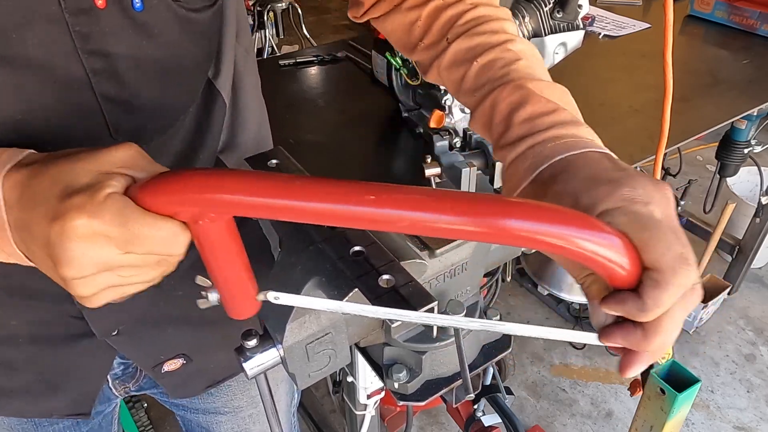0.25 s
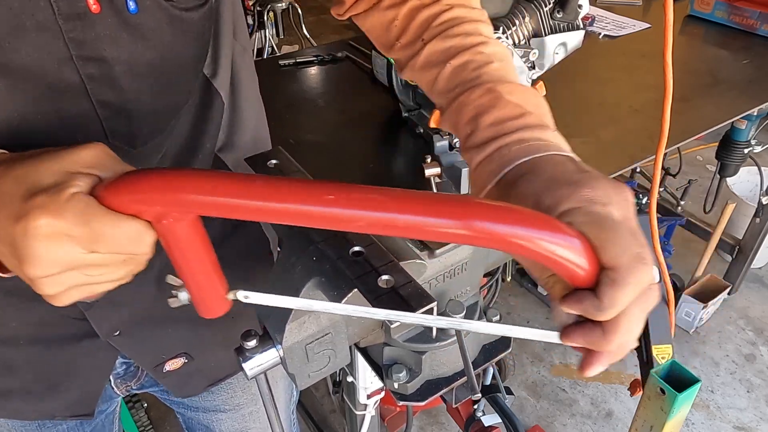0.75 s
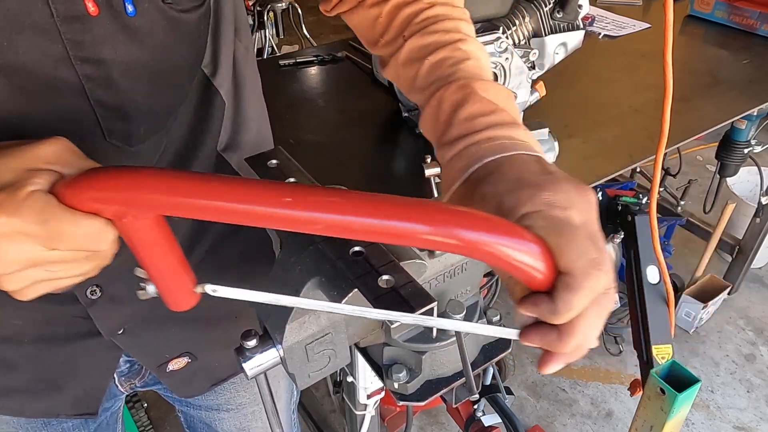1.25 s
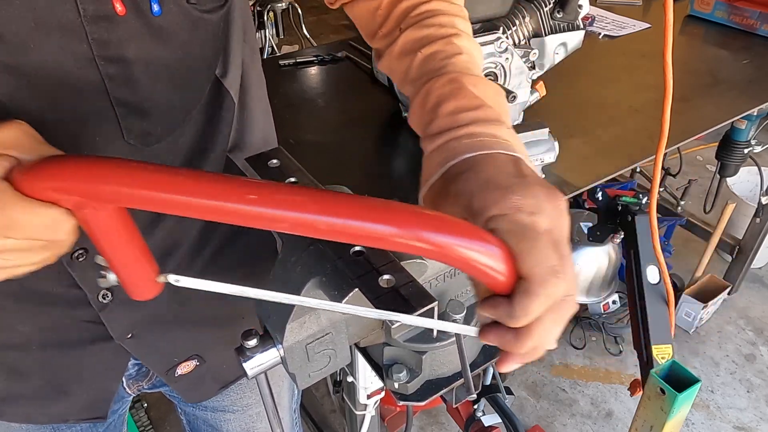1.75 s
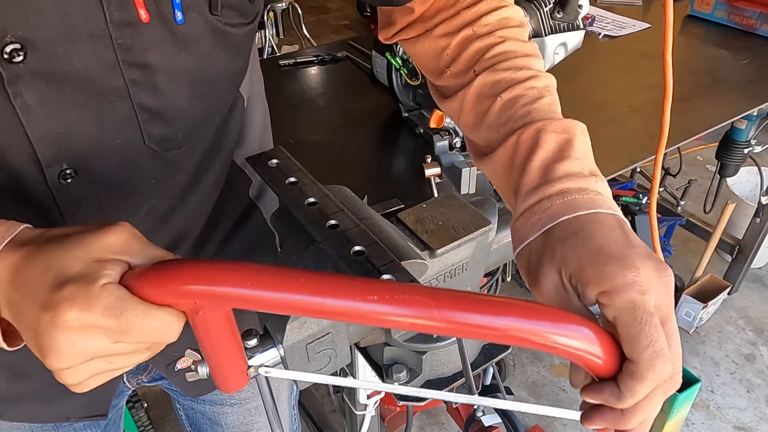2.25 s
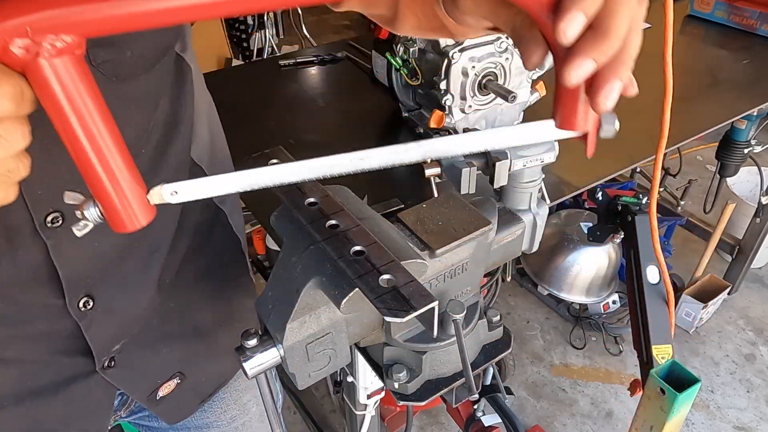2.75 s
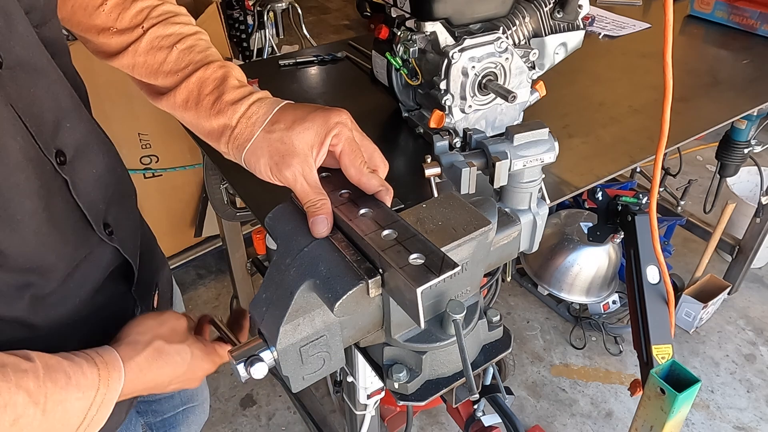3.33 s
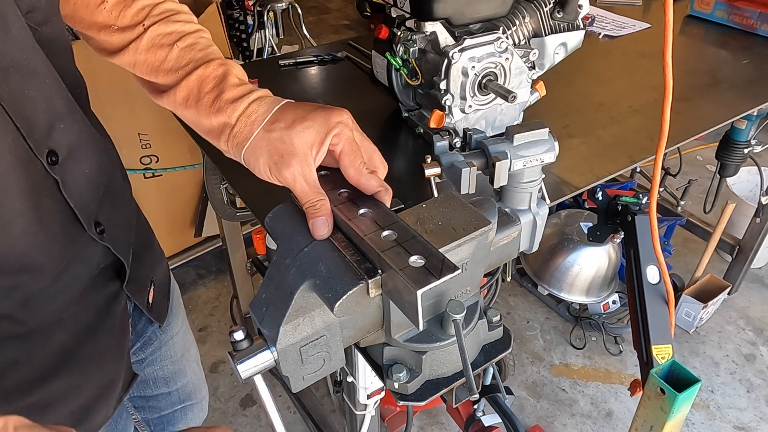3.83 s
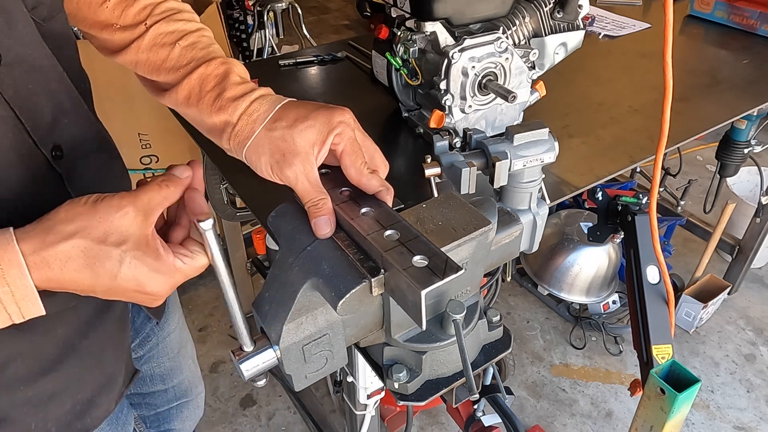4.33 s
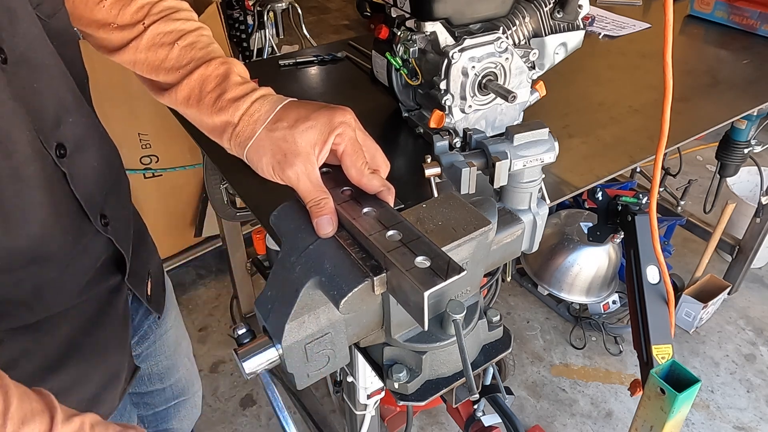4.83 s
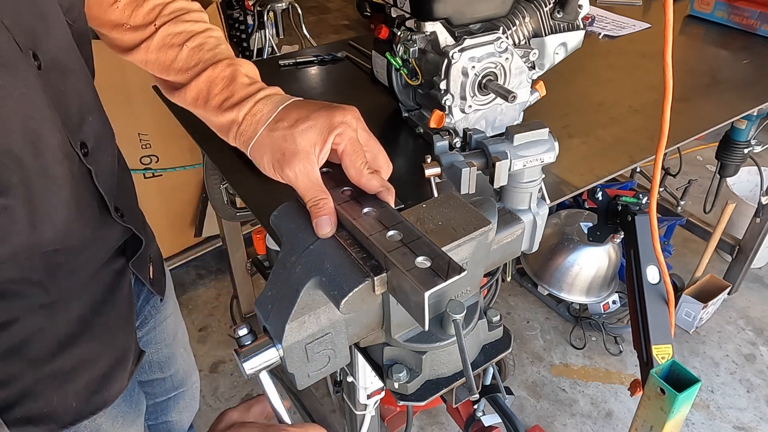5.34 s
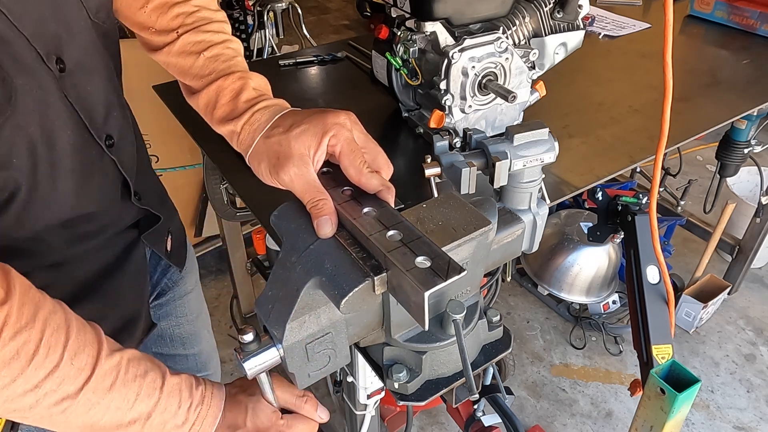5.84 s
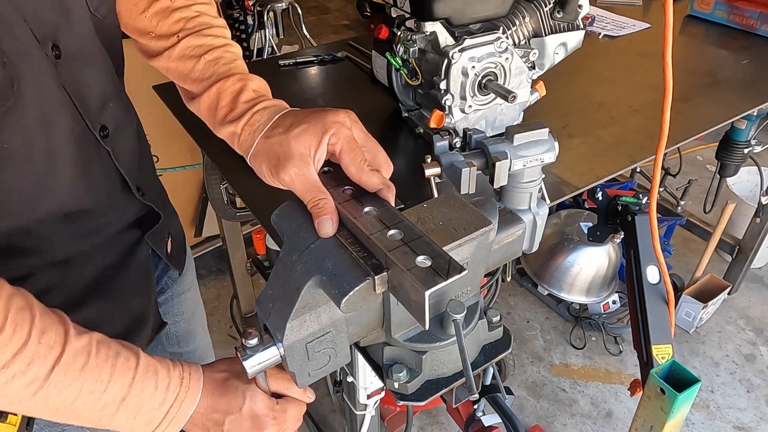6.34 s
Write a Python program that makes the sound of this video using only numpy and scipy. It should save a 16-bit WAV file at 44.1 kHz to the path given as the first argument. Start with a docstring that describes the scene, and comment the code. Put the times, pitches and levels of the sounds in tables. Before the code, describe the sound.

A hacksaw rasps fast through ringing steel, the offcut drops and bounces, then the saw is set down and a vise handle ticks and knocks.

```python
"""A garage, with two close microphone capsules at a workbench: low rumble, faint far traffic and rustling sleeves.
A hacksaw rasps through a steel bar in a bench vise: dense clicks ring bar, frame and bench in push and pull strokes.
The offcut drops and bounces as decaying modes and cracks of noise; the saw knocks and rattles when put down.
Then a hand works the vise: the handle ticks and jingles, the jaws knock, the bench thumps and a part clatters.
A short room of feedback delays follows the bench sounds."""
import sys
import numpy as np
from scipy import signal
from scipy.fft import rfft, irfft, next_fast_len
from scipy.io import wavfile

SR = 44100
rng = np.random.default_rng(int(sys.argv[2]) if len(sys.argv) > 2 else 0)


def wav_out(sig):
    """Save sig, one row per channel (or a flat mono array), as 16-bit PCM at SR to the path in sys.argv[1]."""
    wavfile.write(sys.argv[1], SR, np.round(np.clip(np.atleast_2d(sig).T, -1, 1) * 32767).astype(np.int16))


N = 290178


def from_db(db):
    """Gain of a level in dB."""
    return 10 ** (np.asarray(db) / 20)


def rms_one(x):
    """Scaled to rms 1."""
    return x / np.sqrt(np.mean(x ** 2) + 1e-20)


def in_time(rows):
    """Columns joined by lines; the first, a level in dB, falls silent outside the rows."""
    s, *columns = np.transpose(rows)
    t = np.arange(N) / SR
    out = [np.interp(t, s, column) for column in columns]
    out[0][(t < s[0]) | (t > s[-1])] = -200
    return out


def at_hz(points, hz):
    """Table value on a log-frequency axis."""
    points = np.array(points)
    return np.interp(np.log(hz + 1), np.log(points[:, 0]), points[:, 1])


def filtered(x, gain_at):
    """Applies a gain per frequency, with silence padded behind."""
    size = next_fast_len(N + SR // 4)
    hz = np.fft.rfftfreq(size, 1 / SR)
    return irfft(rfft(x, size) * gain_at(hz), size)[:N]


def colour(x, spectrum):
    """Shapes a dense sound by a spectrum."""
    return filtered(x, lambda hz: from_db(at_hz(spectrum, hz)))


def drift(per_s):
    """Slow chance of spread 1: low-passed noise drawn at every 40th sample and joined by lines."""
    r = np.exp(-80 * np.pi * per_s / SR)
    noise = rng.standard_normal(N // 40 + 1002)
    slow = rms_one(signal.lfilter([1], [1, -2 * r, r * r], noise)[1000:])
    return np.interp(np.arange(N) / 40, np.arange(len(slow)), slow)


def swells(rows):
    """Level in dB that rises and falls in a straight line around each movement."""
    t = np.arange(N) / SR
    return np.max([rise_db * np.clip(1 - np.abs(t - s) / half, 0, 1) for s, half, rise_db in rows], axis=0)


def grains(per_s, spread_db):
    """Random clicks of uneven size and sign."""
    signs = rng.choice([-1, 1], N)
    sizes = from_db(spread_db * np.minimum(rng.exponential(1, N), 4))
    return sizes * signs * (rng.random(N) < per_s / SR)


def resonate(x, peaks, wander_db, per_s):
    """Parallel resonances, signs alternating; each one's drive wanders as the contact point moves."""
    out = 0
    for k, (hz, width_hz, level_db) in enumerate(peaks):
        r = np.exp(-np.pi * max(width_hz, 2) / SR)
        poles = [1, -2 * r * np.cos(2 * np.pi * hz / SR), r * r]
        zeros = [(1 - r * r) / 2, 0, (r * r - 1) / 2]
        drive = x * from_db(level_db + wander_db * np.clip(drift(per_s), -3, 1.3))
        out = out + (-1) ** k * signal.lfilter(zeros, poles, drive)
    return out


def strike(times, blow_db, modes, spread_db, rise_s):
    """Each blow rings every mode with a strength of its own; one row per blow, blow_db per blow and mode."""
    t = np.arange(SR // 2) / SR
    out = np.zeros((len(times), len(t)))
    chance = rng.standard_normal((len(times), len(modes)))
    blow_db = np.broadcast_to(blow_db, chance.shape)
    for k, (hz, level_db, t60) in enumerate(modes):
        height = from_db(blow_db[:, k] + level_db + spread_db * chance[:, k])
        out += np.outer(height, np.sin(2 * np.pi * hz * t) * from_db(-60 * t / t60))
    return out * (1 - np.exp(-t / rise_s))


def contact(t60, low_hz, high_hz, rise_s):
    """Dying noise in a band, scaled to peak 1; one row per contact."""
    t = np.arange(SR // 2) / SR
    shape = (1 - np.exp(-t / rise_s)) * from_db(-60 * t / np.maximum(t60, .002)[:, None])
    burst = rng.standard_normal(shape.shape) * shape
    burst = signal.sosfilt(signal.butter(2, [low_hz, high_hz], "band", fs=SR, output="sos"), burst)
    return burst / np.abs(burst).max(axis=1, keepdims=True)


def place(times, rows, pan_db):
    """Rows laid out at their times in stereo; positive pan leans left."""
    out = np.zeros((2, N + SR))
    for s, row, pan in zip(times, rows, pan_db):
        at = round(s * SR)
        out[:, at:at + len(row)] += row * from_db([[pan / 2], [-pan / 2]])
    return out[:, :N]


# where the bench sits in the stereo field: pitch_hz, left_over_right_db
BENCH_BALANCE = [(60, -9), (150, 0), (370, -0.5), (930, -3.5), (2310, -1), (5740, -3), (14300, 3)]


def sided(mono):
    """The bench leans a little to the right over most of its pitches; the highest lean left."""
    half = np.array(BENCH_BALANCE) * [1, .5]
    return np.array([colour(mono, half), colour(mono, half * [1, -1])])


# how alike left and right are in the surrounding air: pitch_hz, likeness (1 = the same)
LIKENESS = [(25, .93), (120, 1), (500, 0.81), (2000, 0.25), (6000, 0.27), (14000, .5)]


def wide_noise(spectrum):
    """Stereo noise whose channels are most alike in the bass."""
    hz = np.fft.rfftfreq(N, 1 / SR)
    alike = np.clip(at_hz(LIKENESS, hz), 0, 1)
    mid, side = rfft(rng.standard_normal((2, N)))
    both = np.sqrt(1 + alike) * mid + np.sqrt(1 - alike) * side * [[1], [-1]]
    return rms_one(irfft(both * from_db(at_hz(spectrum, hz)), N))


# spectra of the garage floor and of the traffic far off: pitch_hz, relative level_db per Hz
RUMBLE_SPECTRUM = [(12, -51), (20, 1.5), (65, 4), (186, -3.5), (353, -18), (631, -38), (700, -29),
                   (910, -60), (1540, -120)]
TRAFFIC_SPECTRUM = [(290, -25), (500, -7.5), (711, -7), (1290, 2.5), (3450, -19.5), (5480, -20.5),
                    (8980, -24), (11900, -18.5), (14500, -32.5)]
RUMBLE_DB, SAWING_RUMBLE_DB = -47.5, 3.5   # at rest, and the rise while sawing
TRAFFIC_DB, TRAFFIC_SWAY_DB = -68, 2.4


def garage():
    """Low rumble, stronger while the saw shakes the bench, and faint far traffic."""
    last_release_s = STROKES[-1][1]
    sawing = np.clip((last_release_s + THRUM_FADE_S - np.arange(N) / SR) / THRUM_FADE_S, 0, 1)
    rumble_db = RUMBLE_DB + SAWING_RUMBLE_DB * sawing + 1.3 * drift(0.6)
    traffic_db = TRAFFIC_DB + TRAFFIC_SWAY_DB * drift(.4)
    return wide_noise(RUMBLE_SPECTRUM) * from_db(rumble_db) + wide_noise(TRAFFIC_SPECTRUM) * from_db(traffic_db)


# spectra of hissing cloth and of rubbing hands: pitch_hz, relative level_db per Hz
CLOTH_SPECTRUM = [(880, -17.5), (1500, 13.5), (3030, 9.5), (3950, 3), (4470, 10), (6790, 8), (12100, -19.5),
                  (14500, -27)]
RUBBING_SPECTRUM = [(120, -27), (200, 0), (305, -9.5), (437, -6), (696, -15.5), (1330, -17), (1460, -22.5),
                    (2500, -36), (3250, -63), (5500, -120)]
# arms move and cloth hisses: middle_s, half_length_s, rise_db above rest
REACHES = [(2.3, 0.63, 6), (3.19, .5, 3), (4.9, 0.25, 8.5), (5.75, 0.67, 2), (6.5, 0.55, 8.5)]
# hands rub on bar and screw: middle_s, half_length_s, rise_db above rest
GRIPS = [(2.3, 0.068, 14.5), (3.85, 0.72, 17.5), (5.5, 0.35, 11.5), (6.3, 0.32, 12.5)]
CLOTH_DB, RUBBING_DB = -72, -68.5   # between movements


def rustle():
    """Cloth and skin rub in soft, flickering hiss."""
    cloth_db = CLOTH_DB + swells(REACHES) + 1.46 * drift(26)
    rubbing_db = RUBBING_DB + swells(GRIPS) + 2.9 * drift(10.0)
    return wide_noise(CLOTH_SPECTRUM) * from_db(cloth_db) + wide_noise(RUBBING_SPECTRUM) * from_db(rubbing_db)


# short brushes of sleeve or palm: start_s, rise_s, fall_s, level_db, low_hz, high_hz
SWISHES = [(2.593, 0.078, .04, -56, 3000, 7750), (2.89, .006, .16, -56.5, 1530, 7900),
           (3.062, 0.057, 0.022, -66.5, 8500, 13400), (4.293, 0.036, 0.057, -61, 3550, 7800),
           (4.437, .03, .07, -70, 2960, 6960), (5.597, 0.033, 0.097, -62, 3000, 8540),
           (6.466, 0.022, .05, -65, 3000, 8900)]


def brushes():
    """Grainy fibre clicks in a band swell and fade with each brush, alike in both channels."""
    out = np.zeros((2, N))
    fibres = grains(5000, 2.1) * from_db(2.3 * drift(60))
    for s, rise, fall, level_db, low_hz, high_hz in SWISHES:
        at = round(s * SR)
        t = np.arange(min(SR // 4, N - at)) / SR
        band = signal.butter(2, [low_hz, high_hz], "band", fs=SR, output="sos")
        brush = rms_one(signal.sosfilt(band, fibres[at:at + len(t)]))
        shape = np.clip(np.minimum(t / rise, 1 - (t - rise) / fall), 0, 1) ** 0.97
        out[:, at:at + len(t)] += from_db(level_db) * shape * brush
    return out


ROOM_T60_S, WALL_CUT_HZ, ROOM_DB = 0.39, 5100, -22.5   # t60 in the bass; walls take more treble


def room(x):
    """Eight feedback delays a side, duller on every round."""
    size = next_fast_len(N + SR)
    hz = np.fft.rfftfreq(size, 1 / SR)
    wall = 1 / (1 + 1j * hz / WALL_CUT_HZ)
    out = np.zeros((2, len(hz)), complex)
    for k, lag_s in enumerate(rng.uniform(0.0074, 0.032, 16)):
        loop = from_db(-60 * lag_s / ROOM_T60_S) * wall * np.exp(-2j * np.pi * hz * lag_s)
        out[k % 2] += loop / (1 - loop) * (-1) ** (k // 2)
    return irfft(out * rfft(x, size), size)[:, :N]


# sliding handle modes: pitch_hz, level_db, t60_s
HANDLE_MODES = [(2860, -4, .06), (3300, -2, .07), (3660, 0, .05), (4420, 0, .055), (5480, -1, .08),
                (6750, -3, .06), (8250, -9, .035), (10100, -13, .04), (11900, -17, .03)]
# the loose handle jingles in its bore while it is turned: middle_s, half_length_s, rise_db above rest
JINGLES = [(4.08, 0.18, 23), (4.4, 0.27, 17), (4.79, 0.095, 32), (4.96, 0.17, 27)]
JINGLE_REST_DB = -88.5


def jingle():
    """Small random contacts ring the handle modes."""
    # a mode's t60 sets the width of its resonance
    peaks = [(hz, np.log(1000) / np.pi / t60, level_db) for hz, level_db, t60 in HANDLE_MODES]
    ring = rms_one(resonate(grains(180, 3.0), peaks, wander_db=4.0, per_s=13.5))
    return sided(ring * from_db(JINGLE_REST_DB + swells(JINGLES)))


TICK_T60_S, KNOCK_T60_S = 0.021, 0.13


def taps(tick_db, knock_db):
    """A bright tick and a dull knock; one row per tap."""
    tick = contact(np.full(len(tick_db), TICK_T60_S), 3500, 7360, rise_s=0.00089)
    knock = contact(np.full(len(tick_db), KNOCK_T60_S), 940, 3130, rise_s=0.00025)
    knock = signal.sosfilt(signal.butter(2, 3500, fs=SR, output="sos"), knock)
    return from_db(tick_db)[:, None] * tick + from_db(knock_db)[:, None] * knock


# the loose handle taps its stop and rings: start_s, tick_db, ring_db
HANDLE_HITS = [(3.533, -67, -65), (3.7506, -58, -58.5), (3.923, -68, -66), (3.954, -67, -72),
               (4.001, -62, -62), (4.1595, -51, -64), (4.1974, -59, -62.5), (4.3993, -62, -70),
               (4.7113, -39.5, -46.5), (4.7675, -42, -53), (4.8723, -55, -63), (4.8843, -57, -56),
               (4.9124, -50, -60), (4.9465, -48.5, -70.5), (4.969, -54, -68), (4.997, -46.5, -63),
               (5.028, -51, -63), (5.0469, -51, -72)]
HANDLE_KNOCK_DB = -4   # dull knock relative to the tick
HANDS_PAN_DB, HANDS_CROSS_S = (4, -2.5), 3.1   # left over right, before and after this time


def handle():
    """Each tap of the handle ticks, knocks and rings its modes."""
    s, tick_db, ring_db = np.transpose(HANDLE_HITS)
    ring = strike(s, ring_db[:, None], HANDLE_MODES, spread_db=6.0, rise_s=0.0004)
    return place(s, taps(tick_db, tick_db + HANDLE_KNOCK_DB) + ring, 0 * s + HANDS_PAN_DB[1])


# touches on the vise, and at 3.253 s the knock of the saw put down:
# start_s, tick_db (bright), knock_db (dull), ring_db, pitch_hz (favoured among the modes)
KNOCKS = [(2.4269, -42, -59, -57, 1110), (2.4977, -46, -53.5, -70, 1750), (2.6197, -44, -62, -68, 1550),
          (2.6653, -40, -52, -47, 1550), (2.7372, -53, -76, -76, 1170), (2.8976, -43, -53, -56, 1500),
          (2.92, -37, -36, -59, 1520), (3.253, -19.5, -35.5, -34, 1630), (3.5339, -60, -42, -43.5, 1190),
          (3.8132, -67, -48, -38, 1230), (3.997, -56, -54, -40.5, 1310), (4.0208, -48, -35.5, -30.5, 1360),
          (4.34, -48, -67, -67, 1240), (4.4009, -51, -44, -30, 1363), (4.4513, -61, -50, -45, 1320),
          (5.2942, -49, -45, -37, 2100), (5.3254, -45.5, -30, -34, 1064), (5.4478, -56, -43.5, -51, 1050),
          (5.5977, -64, -49, -48, 1660), (6.5366, -47, -42.5, -61, 2090), (6.5432, -44, -28, -37.5, 2297)]
# jaw and screw modes: pitch_hz, level_db, t60_s
JAW_MODES = [(1064, -1, .13), (1180, -2, .07), (1315, 0, .1), (1620, -3, .06), (2070, -2, .05),
             (2330, -2, .07)]
JAW_DB_PER_OCTAVE = 45   # loss of a mode away from the favoured pitch


def knocks():
    """Touches on the vise, and the saw put down, each tap and ring the modes near a favoured pitch."""
    s, tick_db, knock_db, ring_db, favoured_hz = np.transpose(KNOCKS)
    octaves_off = np.abs(np.log2(np.array(JAW_MODES)[:, 0] / favoured_hz[:, None]))
    blow_db = ring_db[:, None] - JAW_DB_PER_OCTAVE * octaves_off
    rows = taps(tick_db, knock_db) + strike(s, blow_db, JAW_MODES, spread_db=0.5, rise_s=0.003)
    return place(s, rows, np.where(s < HANDS_CROSS_S, *HANDS_PAN_DB))


# the vise body thumps the bench: start_s, level_db
THUMPS = [(2.892, -48.5), (3.812, -59), (4.019, -38.5), (4.398, -56.5), (5.297, -32), (5.328, -39),
          (5.362, -31), (5.452, -36.5), (6.228, -38.5), (6.544, -32), (6.565, -48)]
# bench top modes: pitch_hz, level_db, t60_s
BENCH_TOP_MODES = [(190, -9, .12), (250, -9, .12), (283, 0, .2), (315, -6, .12), (380, -7, .1),
                   (470, -13, .08)]


def thumps():
    """Each thump rings the low modes of the bench top, in the middle of the stereo field."""
    s, level_db = np.transpose(THUMPS)
    return place(s, strike(s, level_db[:, None], BENCH_TOP_MODES, spread_db=1.2, rise_s=.006), 0 * s)


# spectrum of the part's contacts on the bench: pitch_hz, relative level_db per Hz
CLATTER_SPECTRUM = [(180, -46), (300, -29), (422, -6), (488, -35), (584, -7), (861, -20.5), (1270, -5),
                    (2430, -0.5), (3260, -10.5), (7100, -19), (14500, -42)]
# resonances of the part: pitch_hz, width_hz, level_db
CLATTER_PEAKS = [(1280, 120, -16), (1640, 80, -8.5), (2100, 90, -11), (2273, 91, 9), (2506, 90, 3.5),
                 (2655, 80, 8), (3560, 94, -5)]
CLATTER_S, CLATTER_DB = 6.2185, -24
CLATTER_RISE_S, CLATTER_HOLD_S, CLATTER_T60_S = 0.0053, 0.034, 0.26   # the hold counts from the start


def clatter():
    """A quick run of uneven contacts that rings the part and dies away."""
    since = np.maximum(np.arange(N) / SR - CLATTER_S, 0)
    fall_db = -60 * np.maximum(since - CLATTER_HOLD_S, 0) / CLATTER_T60_S
    level = np.minimum(since / CLATTER_RISE_S, 1) * from_db(CLATTER_DB + fall_db)
    hits = grains(3000, 1.5)
    ring = rms_one(resonate(hits, CLATTER_PEAKS, wander_db=-3.0, per_s=11.0))
    return sided((rms_one(colour(hits, CLATTER_SPECTRUM)) + from_db(-4) * ring) * level)


# saw frame resonances: pitch_hz, width_hz, level_db
FRAME_PEAKS = [(1050, 45, 4.5), (3320, 150, -9), (4700, 120, -3), (5380, 150, -2), (6600, 150, -9),
               (8600, 200, -4.5)]
SET_DOWN_S, SET_DOWN_DB, SET_DOWN_T60_S = 3.254, -44, 0.3


def set_down():
    """The saw frame is put down: a dying rattle through its resonances."""
    since = np.arange(N) / SR - SET_DOWN_S
    rattle = rms_one(resonate(grains(3000, 2.2), FRAME_PEAKS, wander_db=-0.5, per_s=20.0))
    level = from_db(SET_DOWN_DB - 60 * np.maximum(since, 0) / SET_DOWN_T60_S)
    return sided(rattle * (since > 0) * level)


# the offcut lands and bounces: start_s, level_db, crack_db (relative to level_db), crack_t60_s
BOUNCES = [(2.029, -9.5, -6.5, 0.2), (2.083, -9, -3.5, 0.21), (2.178, -17, 6, 0.13),
           (2.217, -14.5, -9.5, 0.063)]
# offcut modes: pitch_hz, level_db, t60_s
OFFCUT_MODES = [(963, -16, .2), (1064, -11, .32), (2243, -13, .3), (3784, -12, .26), (5172, -12, .18),
                (1329, -22, .26), (1690, -21, .2), (2650, -19, .28), (2909, -15, .2), (3270, -20, .12),
                (4794, -14, .12), (1768, -22, .2), (2051, -23, .2), (3038, -18, .13), (4511, -20, .12),
                (6264, -16, .13), (7580, -24, .15), (5000, -17, .06), (6730, -19, .05), (10070, -28, .12),
                (10530, -34, .12), (11640, -36, .1)]
AFTER_RATTLE_DB, AFTER_RATTLE_T60_S = -15, .32   # dense dull tail relative to each crack


def offcut():
    """Each bounce clacks, rattles and sets the free bar ringing."""
    s, level_db, crack_db, t60 = np.transpose(BOUNCES)
    crack = contact(t60, 1100, 5600, rise_s=0.00027)
    crack = crack + from_db(-25) * contact(0.73 * t60, 6400, 15000, rise_s=.001)
    tail = contact(0 * s + AFTER_RATTLE_T60_S, 900, 3400, rise_s=0.0093)
    crack = crack + from_db(AFTER_RATTLE_DB) * tail
    ring = strike(s, level_db[:, None], OFFCUT_MODES, spread_db=2.5, rise_s=.002)
    return sided(place(s, ring + from_db(level_db + crack_db)[:, None] * crack, 0 * s)[0])


# strokes, push and pull in turn:
# bite_s, release_s, early_db (rasp drive), late_db (rasp drive), thrum_db (relative drive of the bench)
STROKES = [(-.1, 0.031, -20.5, -27.5, -33), (0.108, 0.255, -23, -32, -32.5), (0.334, 0.49, -23, -28, -37),
           (0.57, 0.686, -20, -22.5, -29.5), (0.787, 0.958, -21.5, -28.5, -27.5),
           (1.031, 1.177, -22.5, -23.5, -29), (1.251, 1.433, -24.5, -26, -30),
           (1.505, 1.646, -23.5, -24, -31.5), (1.731, 1.881, -23.5, -24.5, -35.5),
           (1.951, 2.016, -26, -25, -33)]
CATCH_S, CATCH_DB = 0.021, -7.5   # the teeth catch quickly, this far under the early rasp, then dig in
BITE_S, EASE_S, EASE_DB = 0.049, 0.058, -19.5   # time to full rasp; easing off after release
TURN_DB = (-41, -52)   # rasp in the turn before (even, odd) strokes
# relative boost of the low ring: on (even, odd) strokes, and in the turn between two
EARLY_RING_DB, LATE_RING_DB, TURN_RING_DB = (-3.5, -5.5), (-3, 1), 5.5


def stroke_curve():
    """Each stroke catches, digs in, runs, and eases off into a quiet turn where the low modes stand out."""
    rows = []
    for k, (bite, release, early_db, late_db, _) in enumerate(STROKES):
        early_ring_db = EARLY_RING_DB[k % 2]
        rows += [(bite, TURN_DB[k % 2], TURN_RING_DB),
                 (bite + CATCH_S, early_db + CATCH_DB, early_ring_db),
                 (bite + BITE_S, early_db, early_ring_db),
                 (release, late_db, LATE_RING_DB[k % 2]),
                 (release + EASE_S, late_db + EASE_DB, TURN_RING_DB)]
    return in_time(rows)


THRUM_FADE_S, THRUM_FADE_DB = .25, -21   # the bench rings out after the last stroke


def weight():
    """Thrum level glides from stroke to stroke, then fades."""
    rows = [((bite + release) / 2, thrum_db) for bite, release, _, _, thrum_db in STROKES]
    end, last_db = STROKES[-1][1] + EASE_S, rows[-1][1]
    rows += [(end, last_db), (end + THRUM_FADE_S, last_db + THRUM_FADE_DB)]
    return in_time(rows)[0]


# bench and vise resonances under the saw: pitch_hz, width_hz, level_db
BENCH_PEAKS = [(128, 4.3, -8), (191, 25, -7.5), (278, 14, -3.5), (392, 82, -9.5), (477, 14, 2.5),
               (502.8, 15, 1.5)]
THRUM_SHARE, FULL_STROKE_DB = 0.37, -27   # the bench follows only this share of the rasp's swings in dB


def bench_thrum(clicks, rasp_db):
    """The tooth clicks shake the low resonances of bench and vise."""
    push = from_db(weight() + THRUM_SHARE * (np.maximum(rasp_db, -45) - FULL_STROKE_DB))
    return resonate(clicks * push, BENCH_PEAKS, wander_db=2.0, per_s=16.0) * from_db(22)


# short snaps: snagging teeth, and at 2.0228 s the offcut's first contact: start_s, level_db (peak)
SNAPS = [(0.1734, -12.5), (0.402, -9.5), (.429, -13.5), (1.7795, -18), (2.0228, -12)]


def snaps():
    """Snagging teeth, and the offcut's first contact, each snap in a very short burst of noise."""
    s, peak_db = np.transpose(SNAPS)
    bursts = from_db(peak_db)[:, None] * contact(np.full(len(s), .01), 1300, 4300, rise_s=0.00017)
    return place(s, bursts, 0 * s)[0]


# spectrum of the rasp: pitch_hz, relative level_db per Hz
RASP_SPECTRUM = [(350, -33.5), (600, -9), (764, -22.5), (921, 1.5), (1220, -15), (1340, -8), (2380, -7.5),
                 (4660, 0), (6260, -2), (8180, -19), (10800, -21), (13300, -26), (14800, -48)]
# bar, blade and frame resonances: pitch_hz, width_hz, level_db
BAR_PEAKS = [(910.6, 50, -8), (926, 51, -9), (1049, 66, -10.5), (1153, 27, -12.5), (1333.4, 18, 1.5),
             (1660, 66, -9.5), (1775, 40, -10), (2220, 33, -5.5), (2504, 39, -6.5), (2895, 170, -6),
             (3650, 45, -1), (4455, 72, -2.5), (4844, 41, -4), (5054, 49, -10), (6570, 85, -13),
             (7520, 290, -16), (10056, 17, -15.5), (10684, 300, -28.5), (11300, 160, -21.5)]
# left-right difference in the rasp: pitch_hz, side_db relative to the rasp
FRAME_SIDE = [(800, -19), (2000, -15), (5000, -13.5), (9000, -21), (13000, -7)]
TEETH_PER_S, TOOTH_SPREAD_DB, CHATTER_DB = 3200, 0, 1
BAR_DB, WANDER_DB, WANDER_PER_S = 0, 6.5, 3.5   # ring of the bar against the rasp, and its wander


def saw():
    """Teeth catch the steel in dense clicks that ring the bar, the frame and the bench."""
    rasp_db, ring_db = stroke_curve()
    clicks = rms_one(grains(TEETH_PER_S, TOOTH_SPREAD_DB))
    press = from_db(rasp_db + CHATTER_DB * drift(35))
    cutting = clicks * press
    unit, scale = rms_one(cutting), np.sqrt(np.mean(cutting ** 2))
    bar = rms_one(resonate(unit, BAR_PEAKS, WANDER_DB, WANDER_PER_S))
    steel = rms_one(colour(unit, RASP_SPECTRUM)) + from_db(BAR_DB) * bar
    low = signal.sosfilt(signal.butter(2, 2400, fs=SR, output="sos"), steel)
    # the lower modes swell and recede against the rasp through each stroke
    steel = scale * (steel + (from_db(ring_db + 6.5) - 1) * low)
    mono = steel + bench_thrum(clicks, rasp_db) + snaps()
    # the long frame radiates from both ends, so part of the rasp differs between the ears
    side = rms_one(colour(rng.standard_normal(N), RASP_SPECTRUM))
    ends = colour(side, FRAME_SIDE) * press
    return sided(mono) + ends * [[1], [-1]]


def scene():
    """Bench sounds with their room, over cloth, hands and the garage floor."""
    hand_work = knocks() + thumps() + handle() + jingle()
    bench = saw() + offcut() + set_down() + hand_work + clatter()
    reverb = from_db(ROOM_DB) * room(bench.mean(axis=0))
    return bench + reverb + rustle() + brushes() + garage()


# phase between the two capsules: pitch_hz, lead_rad of the left one
CAPSULE_PHASE = [(0, 0), (1030, -0.11), (1810, -0.45), (3190, -0.8), (4130, -0.55), (4390, -0.32),
                 (6980, 0.22), (14000, 0.13), (14500, -0.22)]
CUTOFF_HZ = 15200   # from here up at least 60 dB down


def record(dry):
    """Two close capsules differ in phase; the top is cut."""
    left = filtered(dry[0], lambda hz: np.exp(1j * at_hz(CAPSULE_PHASE, hz)))
    return signal.sosfilt(signal.cheby2(12, 60, CUTOFF_HZ, fs=SR, output="sos"), [left, dry[1]])


dry = scene()
out = record(dry)
wav_out(out)
```